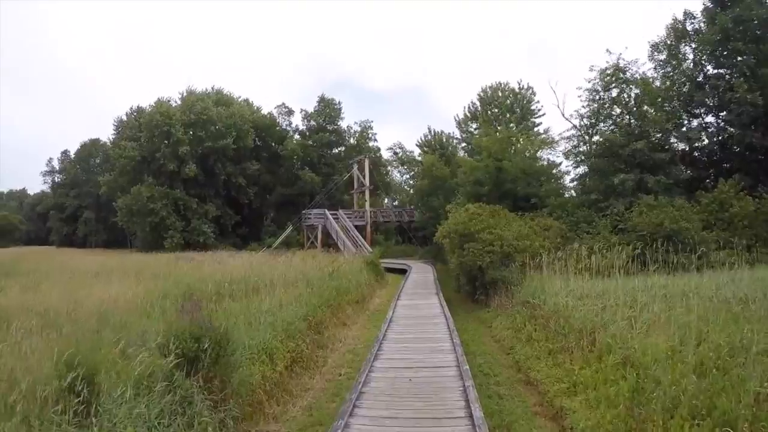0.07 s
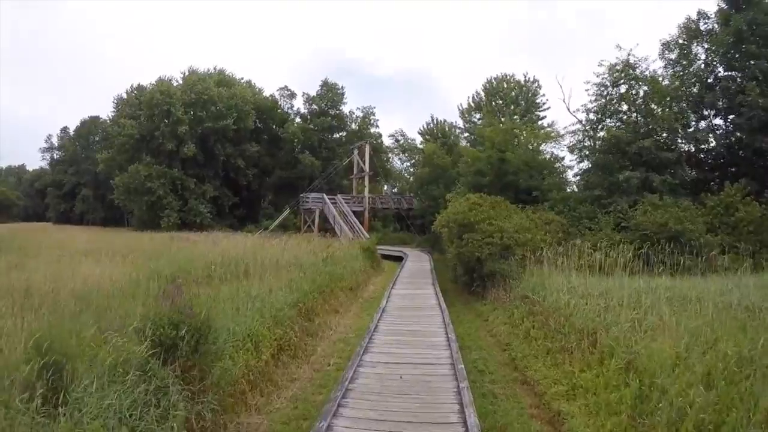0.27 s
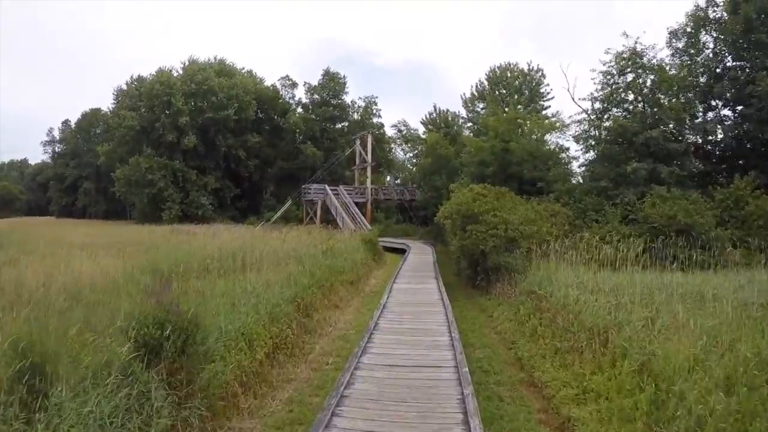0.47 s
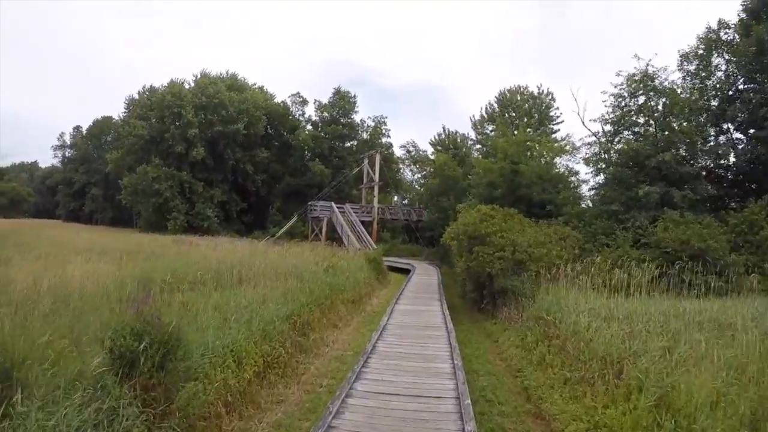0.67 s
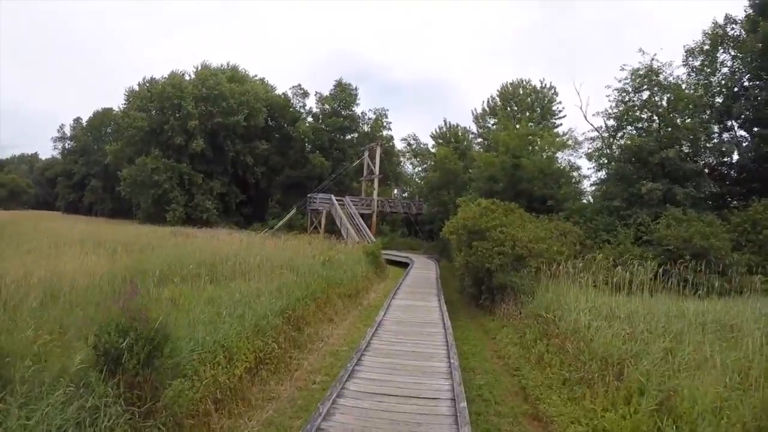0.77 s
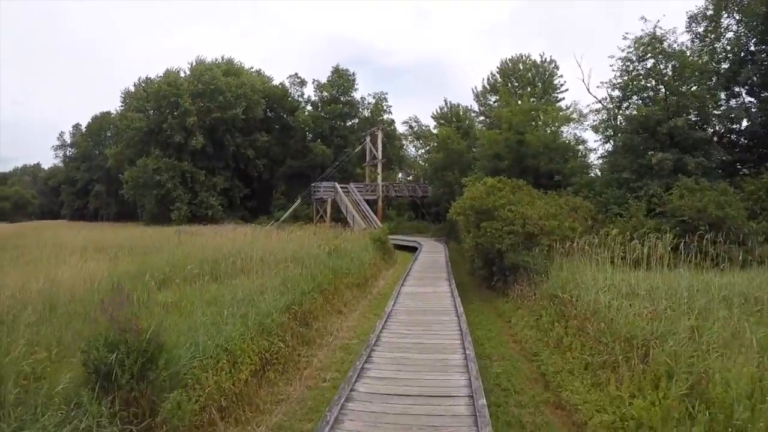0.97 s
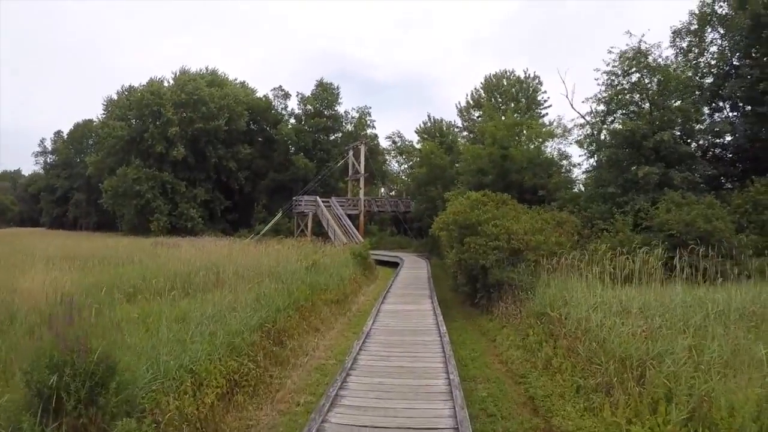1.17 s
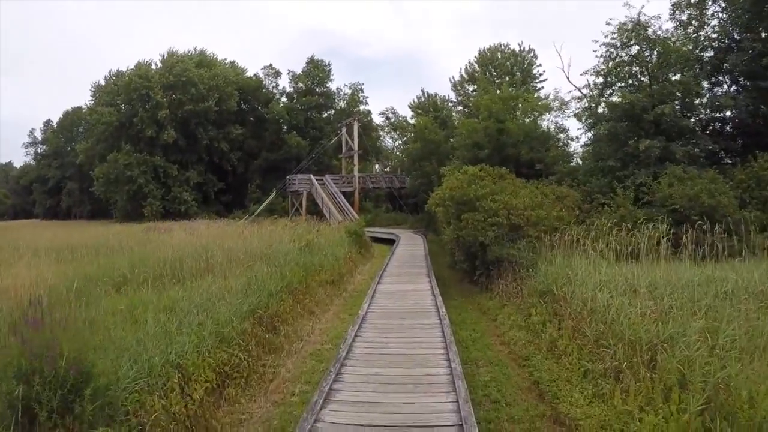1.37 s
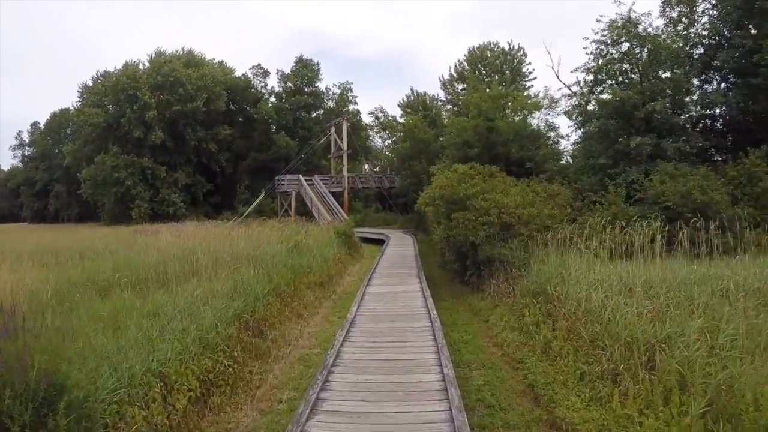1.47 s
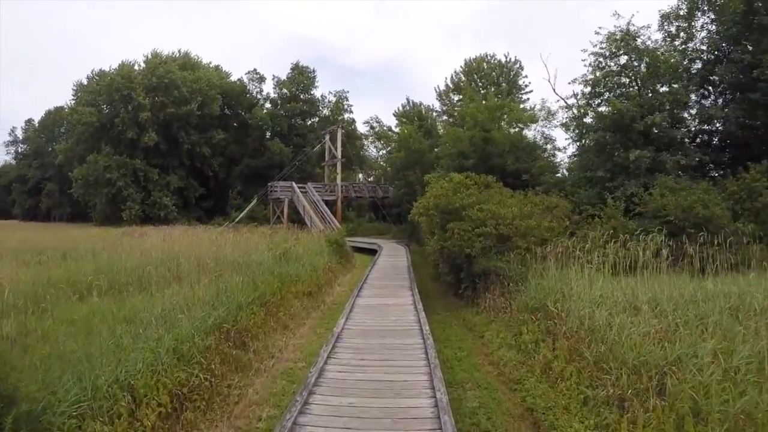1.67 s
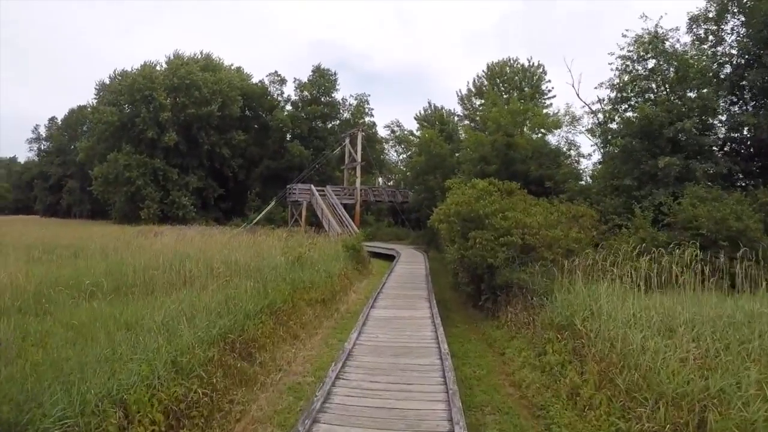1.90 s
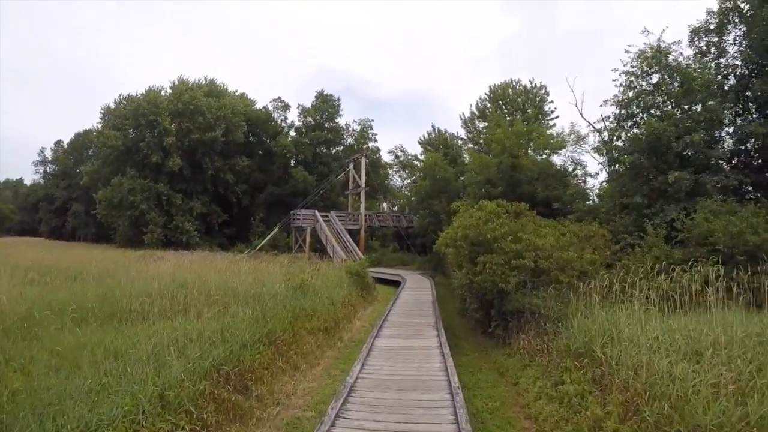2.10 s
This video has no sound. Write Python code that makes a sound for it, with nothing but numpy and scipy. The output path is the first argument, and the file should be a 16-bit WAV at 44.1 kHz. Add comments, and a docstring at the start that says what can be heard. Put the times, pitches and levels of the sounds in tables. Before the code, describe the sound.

Footsteps on a wooden boardwalk: clustered knocks and scuffs at about 0.2, 0.7, 1.25 and 1.75 seconds, the last hardest and sharpest, with gritty ticks. A small metal buckle clinks near 0.9 and 1.98. Low wind rumble gusts throughout, swelling at the end, over soft rustling, a faint insect hiss, cricket pips after 1.4 and distant bird chips. Mono at first, widening to stereo from 1.4.

```python
"""A wooden boardwalk through a marsh in light wind, with someone walking on it.
Heels and soles knock the planks (dying sines), soles scuff (filtered grains), grit ticks and a buckle
clinks (short ringing sines). Wind rumbles on the microphone over rustling air (shaped noise), while
insects hiss and throb, a cricket pips and birds chip and buzz far off (fuzzy bands and gliding tones).
The sound is mono at first and opens to stereo late."""
import sys
import numpy as np
from scipy import signal
from scipy.fft import rfft, irfft
from scipy.io import wavfile
from scipy.ndimage import uniform_filter1d

SR = 44100
rng = np.random.default_rng(int(sys.argv[2]) if len(sys.argv) > 2 else 0)


def wav_out(sig):
    """Save sig, one row per channel (or a flat mono array), as 16-bit PCM at SR to the path in sys.argv[1]."""
    wavfile.write(sys.argv[1], SR, np.round(np.clip(np.atleast_2d(sig).T, -1, 1) * 32767).astype(np.int16))


N = 94374  # length in samples


def amp(db):
    """Turn decibels into a plain multiplier."""
    return 10 ** (np.asarray(db) / 20)


def even(x):
    """Scale a signal to an average (RMS) strength of 1."""
    return x / np.sqrt(np.mean(x ** 2) + 1e-20)


def read(points, hz):
    """Read a spectrum in dB between its points, along a log pitch scale; -100 dB outside."""
    point_hz, value_db = np.transpose(points)
    return np.interp(np.log(hz + 1), np.log(point_hz + 1), value_db, -100, -100)


def add(mix, s, sound):
    """Add a sound to the mix at s seconds, cutting off what runs past the end."""
    part = mix[..., max(round(s * SR), 0):][..., :sound.shape[-1]]
    part += sound[..., :part.shape[-1]]


def curve(table, column):
    """Draw straight lines through one column of a table over time."""
    return np.interp(np.arange(N) / SR, [row[0] for row in table], [row[column] for row in table])


def noise(points, patchy_db):
    """Mid and side noise of a given spectrum, with strength that drifts in patches of pitch and time."""
    # How strong the side is against the mid. Each row: pitch in Hz, side minus mid in dB.
    side_balance = [(60, -15), (380, 3.5), (2350, -5.5), (14700, 3.5)]
    hz = np.fft.rfftfreq(2048, 1 / SR)
    z = rng.standard_normal((5, N // 512 + 5, 1025)).transpose(0, 2, 1)
    patches = even(uniform_filter1d(uniform_filter1d(z[4], 15, 0), 4, 1))
    shape = amp(read(points, hz)[:, None] + patchy_db * patches)
    balance_hz, balance_db = np.transpose(side_balance)
    mid = z[0] + 1j * z[1]
    side = (z[2] + 1j * z[3]) * amp(np.interp(hz, balance_hz, balance_db))[:, None]
    out = signal.istft(np.array([mid, side]) * shape, nperseg=2048, noverlap=1536)[1][:, :N]
    return out / np.sqrt(np.mean(out[0] ** 2))


def wobble(n, width_hz):
    """Complex low-passed noise: a carrier times it is a fuzzy band."""
    z = rng.standard_normal(n) + 1j * rng.standard_normal(n)
    z = signal.sosfilt(signal.butter(2, width_hz / 2, fs=SR, output="sos"), z)
    return z / np.sqrt(np.mean(abs(z) ** 2))


def ring(modes, drive):
    """Dying sines, neighbours in opposite sense, struck by a short force; peak 1."""
    t = np.arange(3000) / SR
    body = np.zeros(3000)
    for k, (hz, db, t60) in enumerate(modes):  # t60: seconds to die by 60 dB
        body += amp(db - 60 * t / t60) * np.sin(2 * np.pi * hz * t) * (-1) ** k
    out = np.convolve(body, drive)
    return out / abs(out).max()


def burst(fade_s):
    """The force of a first contact, then a dying random rattle, with soft edges."""
    rattle_size = 0.16
    t = np.arange(300) / SR
    force = (t == 0) + rattle_size * rng.standard_normal(300) * np.exp(-t / fade_s)
    return rng.choice([-1, 1]) * np.convolve(force, np.hanning(7))


def marsh_air():
    """The rustle of the marsh: patchy noise whose lower part slowly changes in level."""
    # Spectrum of the rustle. Each row: pitch in Hz, relative strength in dB per Hz.
    rustle = [(130, 5), (200, -4), (450, -10.5), (1000, -17), (1800, -20), (4300, -26), (7000, -28.5),
              (11000, -33), (13500, -41.5), (15300, -45)]
    # Slow level of the lower part; only its ups and downs count. Each row: time in seconds, level in dB.
    lower_level = [(0.0, -48.5), (0.44, -48.5), (2.12, -50.5)]
    air = noise(rustle, patchy_db=2.5) * amp(-48.5)
    low = signal.sosfilt(signal.butter(2, 2500, fs=SR, output="sos"), air)
    level_db = curve(lower_level, column=1)
    return air + low * (amp(level_db - level_db.mean()) - 1)


def wind():
    """Wind pushing on the microphone: deep lumps of noise and a higher buffeting, each with its own gusts."""
    # Strength of the gusts. Each row: time in seconds, deep rumble in dB, buffeting in dB.
    gusts = [(0, -35, -41), (.25, -27.5, -37.5), (.33, -27.5, -30.5), (.48, -32.5, -43.5), (.6, -34, -31),
             (.95, -23.5, -34.5), (1.2, -30.5, -30), (1.29, -25, -35.5), (1.58, -33, -39), (1.78, -21, -37),
             (1.88, -25.5, -39), (2.02, -17.5, -33), (2.14, -13.5, -32.5)]
    # Spectrum of the deep rumble. Each row: pitch in Hz, relative strength in dB per Hz.
    deep_spectrum = [(4, -24), (24, 1.5), (41, -1), (70, -17.5), (100, -16.5)]
    # Spectrum of the buffeting. Each row: pitch in Hz, relative strength in dB per Hz.
    buffet_spectrum = [(35, -39), (55, 0.5), (100, -5), (200, -16.5), (350, -34), (700, -38.5)]
    deep = noise(deep_spectrum, patchy_db=0.95) * amp(curve(gusts, column=1))
    buffeting = noise(buffet_spectrum, patchy_db=3.0) * amp(curve(gusts, column=2))
    return deep + buffeting


def insects():
    """A hissing band of fuzzy tone, its loudness throbbing with an unsteady beat; mid and side."""
    pitch_hz, width_hz, level_db = 5507, 630, -60.5
    throb_hz, throb_depth = 56.6, 0.24
    t = np.arange(N) / SR
    throb = 1 + throb_depth * np.sin(2 * np.pi * throb_hz * t + 3 * wobble(N, 5.7).real)
    carrier = np.exp(2j * np.pi * pitch_hz * t)
    band = [(wobble(N, width_hz) * carrier).real * throb for _ in ("mid", "side")]
    return amp(level_db) * np.sqrt(2) * np.array(band)


def cricket():
    """Short pure pips in evenly spaced runs, each pip a little louder or softer."""
    # Runs of pips. Each row: start in seconds, end in seconds, typical level of a pip in dB.
    runs = [(1.42, 1.65, -59), (1.788, 2.14, -55.5)]
    pip_hz, pip_gap_s, pip_s = 8600, .0532, .013
    out = np.zeros(N)
    t = np.arange(0, pip_s, 1 / SR)
    pip = np.sin(np.pi * t / pip_s) * np.sin(2 * np.pi * pip_hz * t)
    for start, end, db in runs:
        for s in np.arange(start, end, pip_gap_s):
            add(out, s, amp(db + 2 * rng.standard_normal()) * pip)
    return out * np.array([[1], [.2]])


def call(length, from_hz, to_hz, db, buzzy):
    """One soft-edged note gliding in pitch; a buzzy one is blurred by noise and flutters in loudness."""
    blur_hz, buzz_hz = 300, 149
    t = np.arange(0, length, 1 / SR)
    pitch_hz = from_hz + (to_hz - from_hz) * np.sin(.5 * np.pi * t / length) ** 2
    tone = np.exp(2j * np.pi * np.cumsum(pitch_hz) / SR)
    if buzzy:
        blur = wobble(8192, blur_hz)[-len(t):]  # the end, where the filter has settled
        tone = tone * blur * (1 + 0.44 * np.sin(2 * np.pi * buzz_hz * t))
    return amp(db) * np.sqrt(2) * np.sin(np.pi * t / length) ** .5 * tone.real


def birds():
    """Clear chips that fall in pitch, and high buzzy notes that rise slightly."""
    # Falling chips. Each row: start in seconds, length in seconds, from Hz, to Hz, level in dB.
    chips = [(.118, .03, 4900, 3700, -63), (.25, .047, 4550, 3250, -62), (1.492, .052, 5050, 3650, -58),
             (1.63, .052, 4700, 3150, -62)]
    # Buzzy notes. Each row: start in seconds, length in seconds, middle pitch in Hz, level before buzz in dB.
    buzzes = [(.07, 0.069, 8360, -62.5), (0.766, 0.075, 9000, -67), (0.923, 0.077, 8240, -61),
              (1.395, 0.043, 8500, -68), (1.475, 0.072, 9000, -62), (1.542, .075, 8100, -61),
              (2.03, 0.078, 8250, -63.5)]
    half_rise_hz = 80.5
    out = np.zeros(N)
    for s, length, from_hz, to_hz, db in chips:
        add(out, s, call(length, from_hz, to_hz, db, buzzy=False))
    for s, length, hz, db in buzzes:
        add(out, s, call(length, hz - half_rise_hz, hz + half_rise_hz, db, buzzy=True))
    return out * np.array([[1], [.2]])


def scuffs():
    """Dense uneven grains under the sole, six kinds of different pitch, tilted dull or bright."""
    # Scuffs. Each row: start in seconds, length in seconds, level before fading in dB,
    # brightness in dB per octave.
    scrapes = [(0.188, 0.27, -49, -5.5), (.69, 0.19, -47.5, -6.5), (.895, 0.067, -50.5, -2.5),
               (1.082, 0.3, -50, -6), (1.214, 0.1, -41.5, -8.5), (1.298, 0.11, -55.5, -1),
               (1.725, 0.12, -41.5, -6), (1.748, 0.038, -39, 7.5), (1.81, 0.045, -46.5, -3.5),
               (1.972, 0.034, -52.5, 10.5)]
    grains_per_s = 900  # for a scuff of no tilt; brighter ones have more
    grain_spread_db, grain_q = 5, 2.84
    n = 16384
    t, hz = np.arange(n) / SR, np.fft.rfftfreq(n, 1 / SR)
    out = np.zeros((2, N))
    for s, length, db, tilt_db in scrapes:
        size = amp(grain_spread_db * np.minimum(rng.exponential(1, (6, 2, n)), 4))
        size = size * rng.choice([-1, 1], (6, 2, n))
        grains = size * (rng.random((6, 2, n)) < grains_per_s * amp(tilt_db) / SR)
        pitch_hz = np.geomspace(330, 5900, 6)[:, None, None] * rng.uniform(0.77, 1.165, (6, 1, 1))
        kinds = 1 / (1 + 1j * grain_q * (hz / pitch_hz - pitch_hz / (hz + 1)))  # one resonance per kind
        colour = amp(tilt_db * np.log2(hz / 1000 + 0.0062))
        colour = colour / (1 + (300 / (hz + 1)) ** 4) / (1 + (hz / 7000) ** 6)  # trim both ends
        scrape = even(irfft((rfft(grains) * kinds).sum(0) * colour))
        swell = np.sin(np.pi * np.clip(t / length, 0, 1) ** .6) * (t < length)
        add(out, s, amp(db) * swell * scrape)
    return out


def grit():
    """Thin soft-edged ticks, each a cluster of five quickly dying sines."""
    # Grit ticks. Each row: start in seconds, peak level in dB, pitch in Hz.
    ticks = [(0.194, -35.5, 2430), (.345, -29, 3180), (0.7468, -44, 3580), (0.756, -33, 3380),
             (0.76, -34, 3100), (0.797, -32, 3500), (0.812, -27.5, 3070), (1.191, -33.5, 3440),
             (1.755, -21, 4080), (1.816, -32, 3380), (1.83, -33, 2470), (1.837, -34, 2960)]
    t60_s, spread = 0.0061, 0.517
    out = np.zeros(N)
    for s, db, hz in ticks:
        modes = [(hz * (1 + spread * k), -3 * abs(k), t60_s) for k in np.linspace(-.6, .8, 5)]
        add(out, s, amp(db) * ring(modes, burst(0.00046)))
    return out * np.array([[1], [.2]])


def buckle():
    """A metal buckle bouncing five times, each bounce weaker and ringing the same sines."""
    # Clinks. Each row: start in seconds, peak level of the first bounce in dB.
    clinks = [(.912, -34.5), (.921, -20.5), (0.948, -41), (1.973, -33.5), (1.9829, -22)]
    # Ringing pitches of the buckle. Each row: pitch in Hz, relative strength in dB.
    metal = [(1680, -8.5), (2220, -2.5), (2760, 0.5), (3170, 3), (3380, 0), (3870, -6.5), (5470, -7.5),
             (7100, -16)]
    t60_s, bounce_fade_s, bounce_gap_s = 0.018, 0.0032, 0.0024
    modes = [(hz, db, t60_s) for hz, db in metal]
    out = np.zeros(N)
    for s, db in clinks:
        for k in range(5):
            late = k * bounce_gap_s * rng.uniform(.85, 1.1)
            bounce = ring(modes, burst(0.00073))
            add(out, s + late, amp(db) * np.exp(-late / bounce_fade_s) * bounce)
    return out * np.array([[1], [.2]])


def steps():
    """Each knock rings another spot of the planks, strongest near its own colour; mid and side."""
    # Knocks. Each row: start in seconds, peak level of the upper modes in dB, colour in Hz,
    # deep modes compared with the upper ones in dB.
    knocks = [(0.193, -31.5, 890, -21), (.202, -32, 430, -14), (.22, -38, 900, -13), (0.227, -45, 420, -5),
              (0.319, -47, 400, 15.5), (0.344, -36, 1500, -15), (0.7, -29, 645, -8.5),
              (.731, -26.5, 600, -15), (0.736, -33.5, 1350, -9), (.762, -32.5, 1200, -13),
              (.766, -27, 420, -9), (0.805, -33.5, 900, -20), (1.223, -27.5, 950, 1),
              (1.237, -28.5, 800, -4.5), (1.269, -21, 740, -7), (1.325, -35, 1910, -17),
              (1.408, -34.5, 597, -5.5), (1.719, -23, 510, -1.5), (1.745, -31, 650, -2),
              (1.7552, -16.5, 1240, 1.5), (1.765, -22.5, 447, 2.5), (1.782, -28, 600, -4),
              (1.822, -36.5, 1200, -5), (1.842, -45.5, 400, 17.5), (2.052, -34.5, 450, -9)]
    # Ringing pitches (modes) of the planks. Each row: pitch in Hz before detuning, relative strength in dB.
    plank = [(120, -7), (190, -4), (250, -6), (350, 3.5), (450, 4), (600, 0), (830, -2.5), (1100, 2),
             (1300, 6.5), (1600, 5), (1880, 5), (2300, -0.5)]
    low_hz = 280  # modes below this are the deep ones
    fall_db = 5.5  # upper modes lose this one octave off the colour
    detune, contact_s = 0.044, 0.0021  # detune is a share of the pitch
    t60_at_1k_s, damping = .009, .9  # higher modes die sooner
    out = np.zeros((2, N))
    for s, db, colour_hz, deep_db in knocks:
        # hard blows reach the two microphone ports more unlike
        side = amp(np.clip(28 + db, -12, 6))
        for lo, hi, lift_db, wide in ((0, low_hz, deep_db, .3), (low_hz, SR, 0, 1)):
            modes = []
            for hz, mode_db in plank:
                if lo <= hz < hi:
                    off_colour_db = (lo > 0) * fall_db * np.log2(hz / colour_hz) ** 2
                    t60_s = t60_at_1k_s * (1000 / hz) ** damping
                    modes.append((hz * (1 + detune * rng.standard_normal()), mode_db - off_colour_db, t60_s))
            near, across = ring(modes, burst(contact_s)), ring(modes, burst(contact_s))
            add(out, s, amp(db + lift_db) * np.array([near, wide * side * across]))
    return out


def scene():
    """Sum all sources as mid and side, then turn them into left and right."""
    background = marsh_air() + wind() + insects() + cricket() + birds()
    walker = scuffs() + grit() + buckle() + steps()
    mid, side = background + walker
    return np.array([mid + side, mid - side])


def record(dry):
    """Mono until the stereo image opens; then the highest treble is cut off."""
    opens_s, full_ramp_s, edge_hz = 1.408, 0.73, 15150
    mid, side = (dry[0] + dry[1]) / 2, (dry[0] - dry[1]) / 2
    t = np.arange(N) / SR - opens_s
    side = side * (t > 0) * np.clip(0.072 + t / full_ramp_s, 0, 1)  # starts with a small jump
    out = np.array([mid + side, mid - side])
    lowpass = signal.firwin(511, edge_hz, window=("kaiser", 9), fs=SR)
    return signal.oaconvolve(out, lowpass[None], "same")


dry = scene()
out = record(dry)
wav_out(out)
```